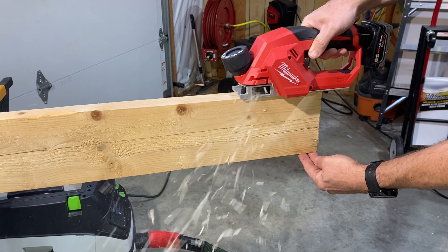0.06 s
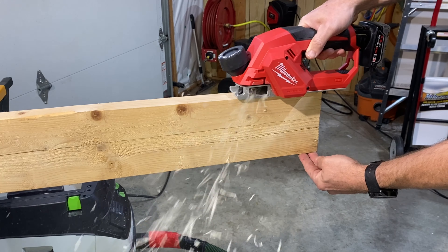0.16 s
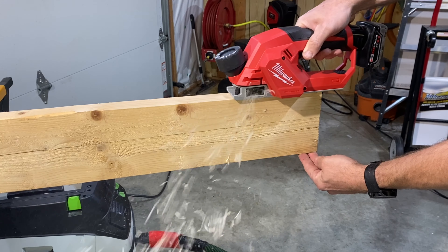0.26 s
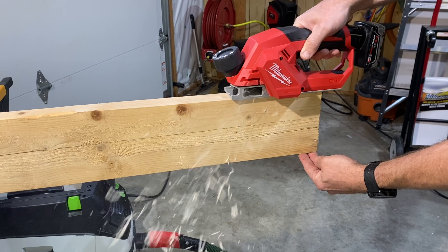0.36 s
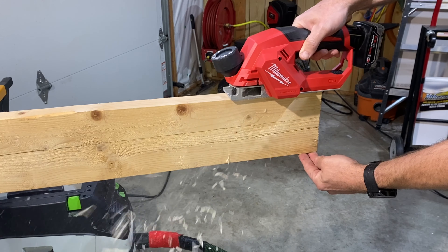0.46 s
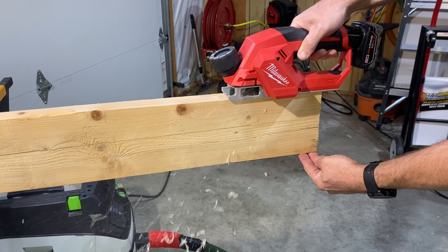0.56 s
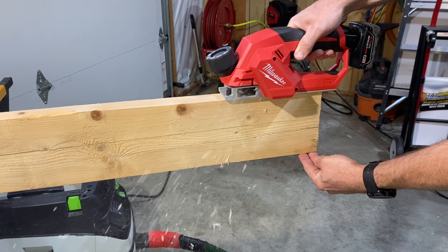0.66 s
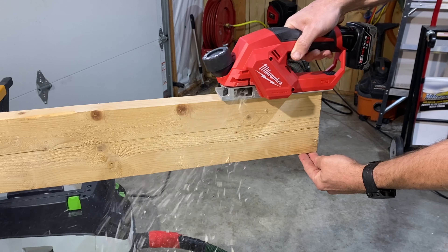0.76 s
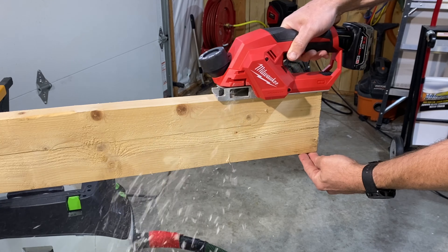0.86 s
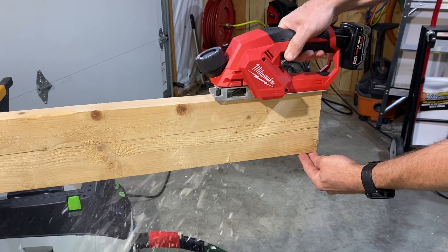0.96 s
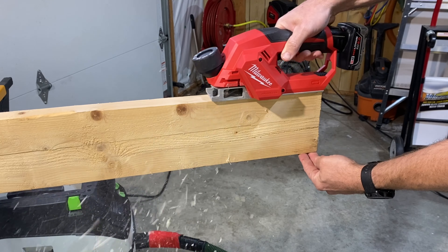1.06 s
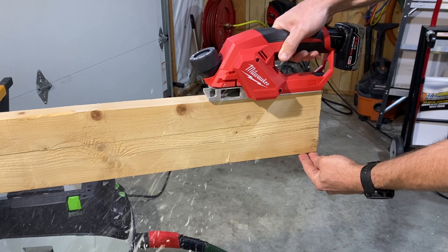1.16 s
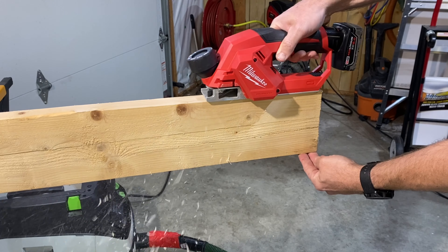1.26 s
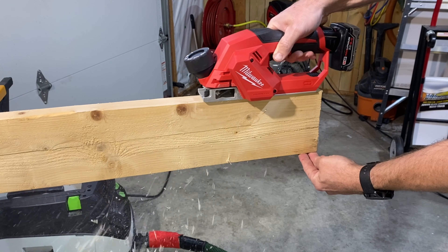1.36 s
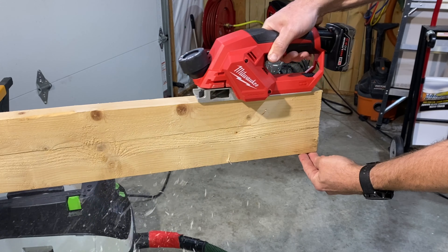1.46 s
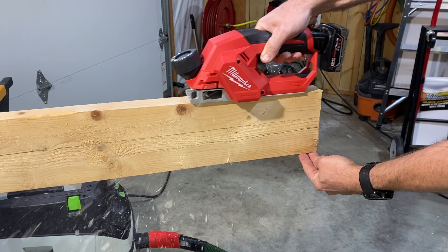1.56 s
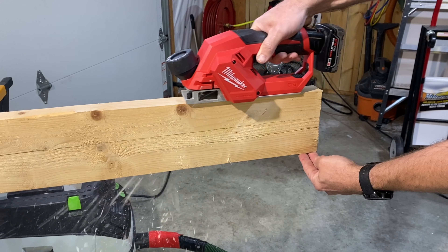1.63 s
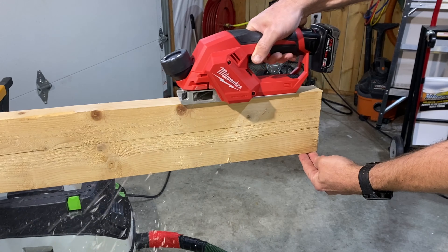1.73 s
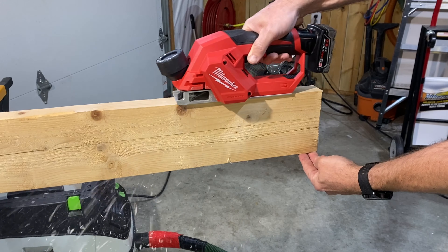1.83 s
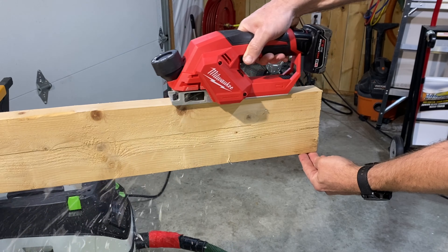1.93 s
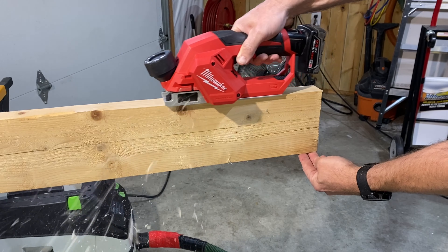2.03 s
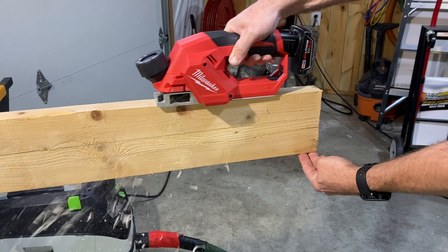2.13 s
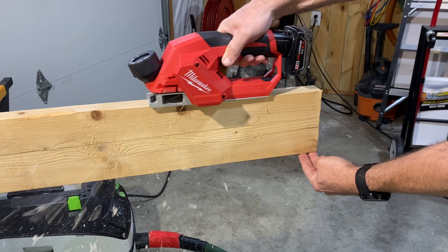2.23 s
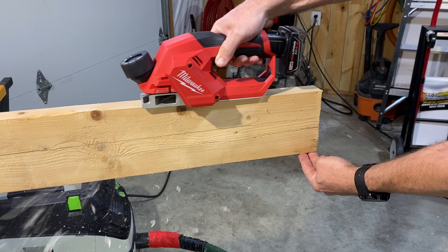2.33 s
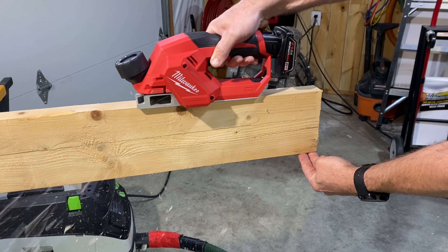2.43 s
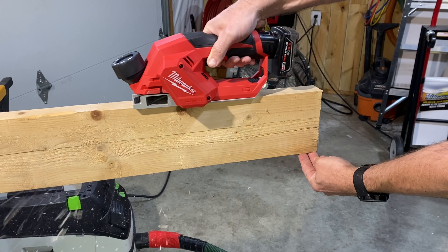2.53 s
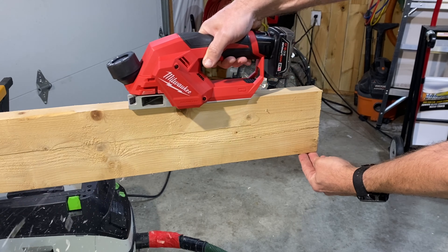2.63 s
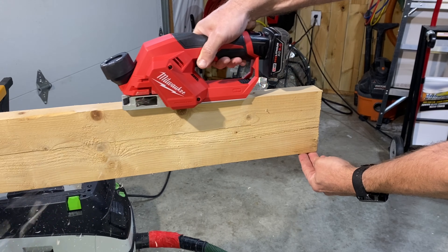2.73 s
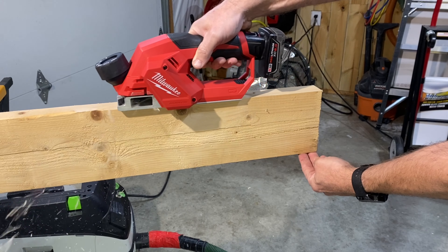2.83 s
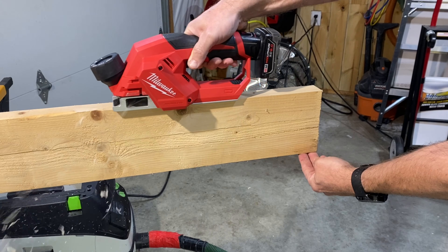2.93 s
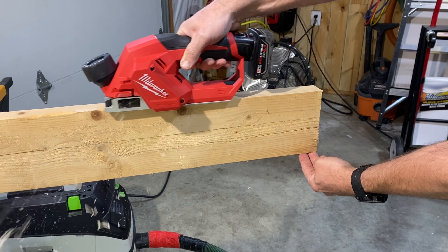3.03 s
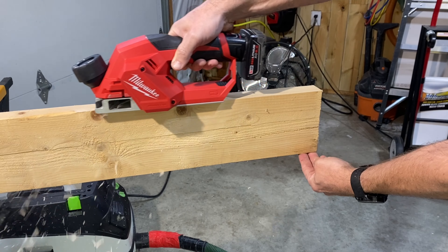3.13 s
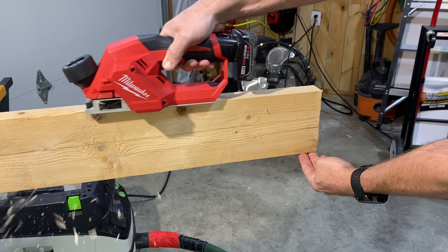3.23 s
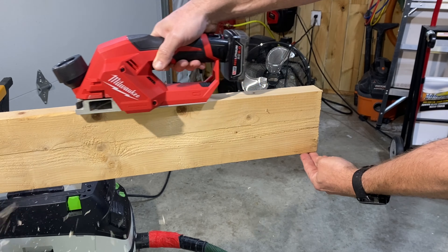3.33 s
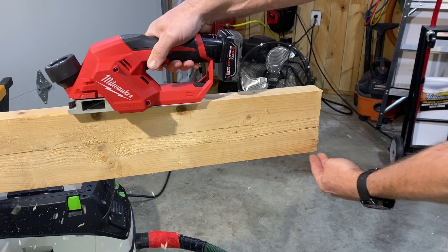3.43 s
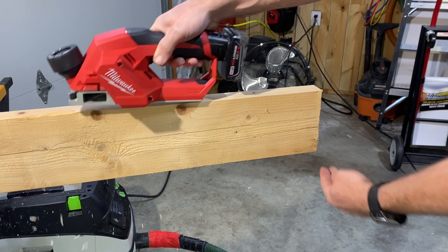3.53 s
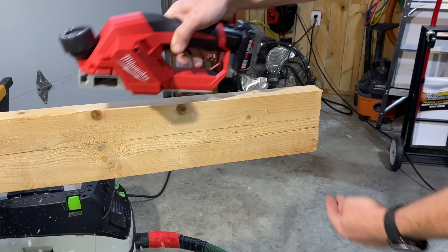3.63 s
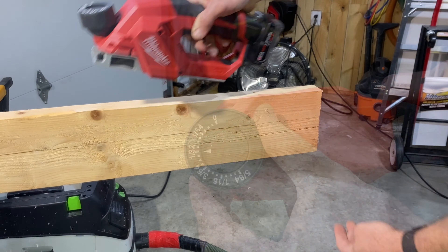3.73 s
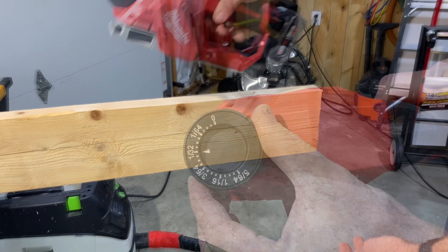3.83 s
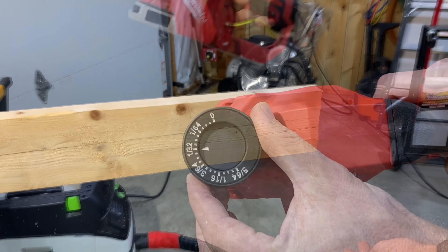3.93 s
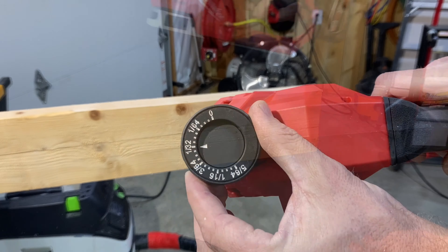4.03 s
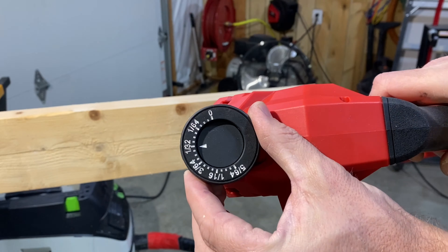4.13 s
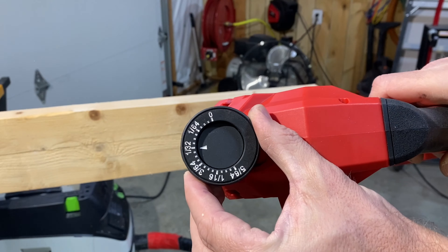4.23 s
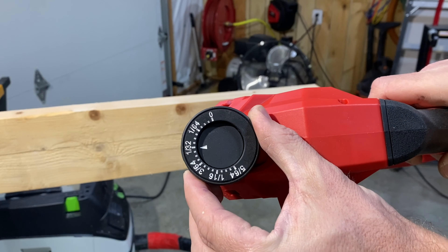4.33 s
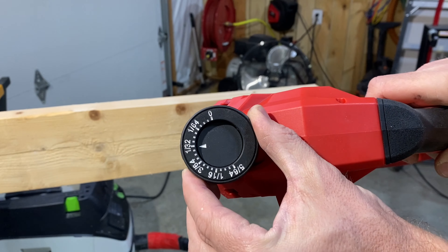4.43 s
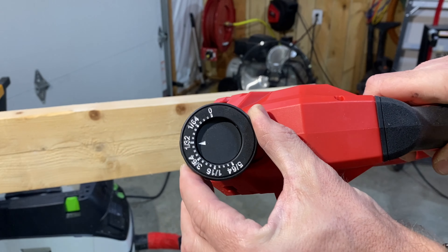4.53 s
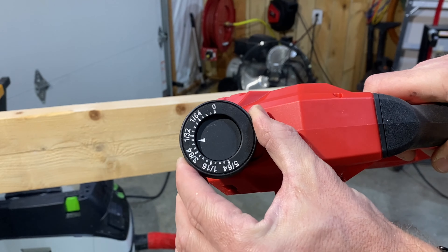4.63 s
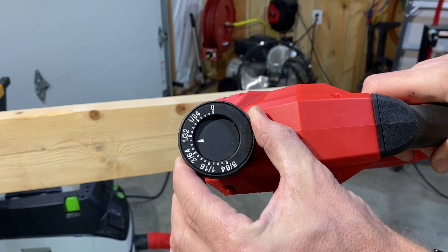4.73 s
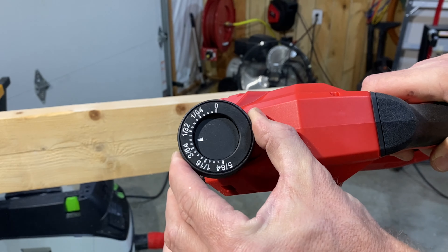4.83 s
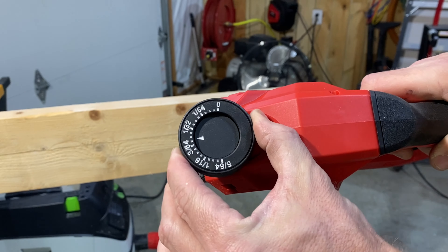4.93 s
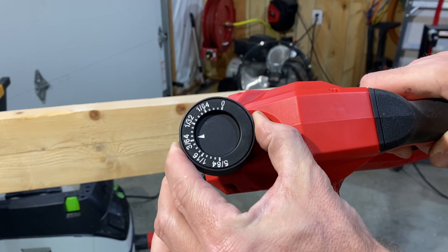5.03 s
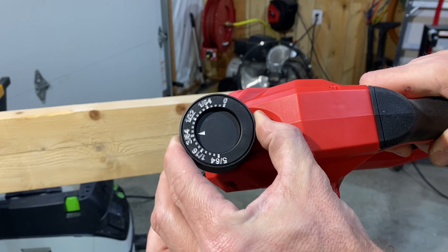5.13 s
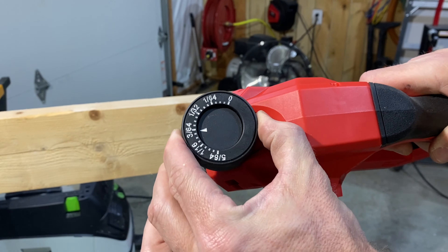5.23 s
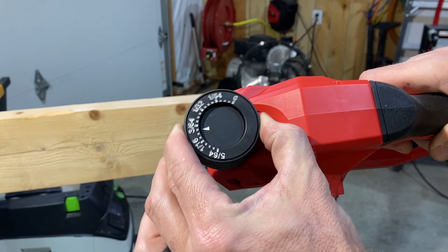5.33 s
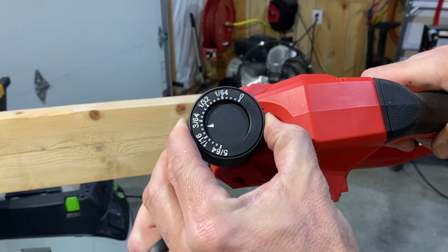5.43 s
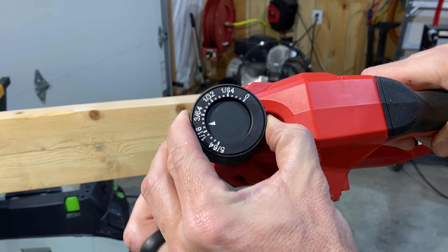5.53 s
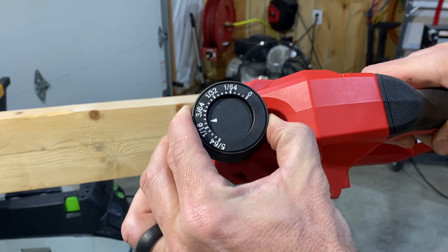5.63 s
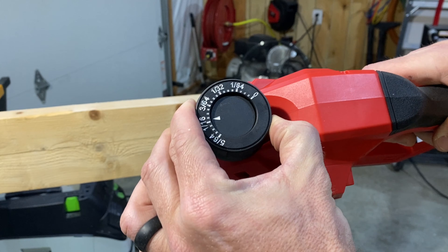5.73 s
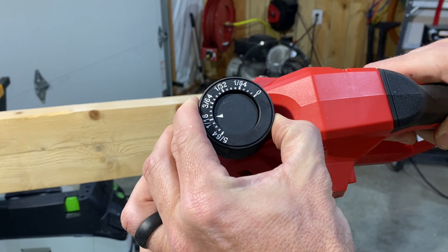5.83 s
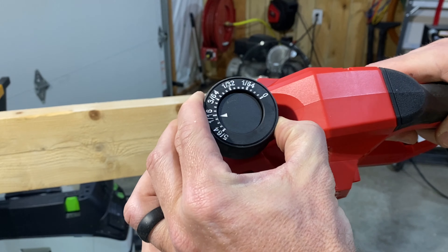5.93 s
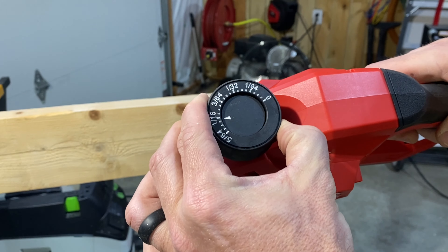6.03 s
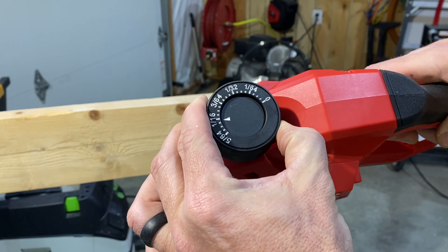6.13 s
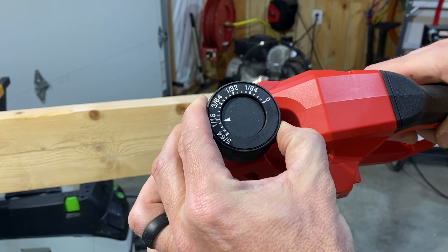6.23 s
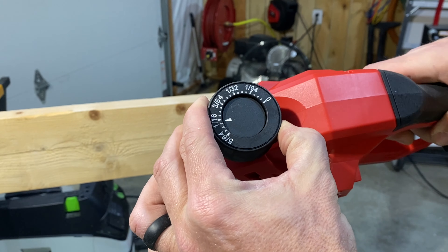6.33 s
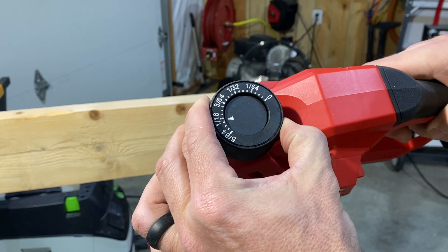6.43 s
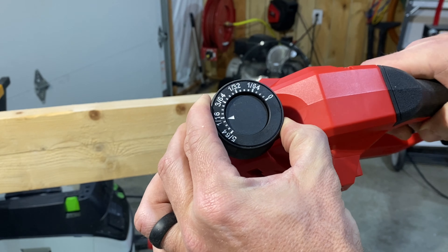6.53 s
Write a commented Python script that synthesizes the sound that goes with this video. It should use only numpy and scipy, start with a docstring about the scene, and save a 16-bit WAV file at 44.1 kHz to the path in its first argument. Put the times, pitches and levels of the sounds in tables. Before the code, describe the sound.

A cordless hand planer shaves a board edge in one long pass, its high whine singing over a rough roar and the hiss of flying chips. The cut runs out and the sound quickly fades. Then the depth dial is turned through eight crisp clicks, each with a bright, short ring, among faint rustles of the hands. The microphone is close, in a workshop with a low hum.

```python
"""A workshop with a low hum, a phone's microphones close to a cordless hand planer. The two-blade drum
bites deep into a board edge, then skims, singing at multiples of its turning rate over the belt-driven
motor and the rush of chips. The cut runs out; at 3.6 s the drum brakes while the planer's whole sound is
faded out, ever faster. Then, among small rustles of the hands, the depth dial is turned through eight
detents, each a snap with a bright, ringing tail."""
import sys
import numpy as np
from scipy import signal
from scipy.fft import rfft, irfft, next_fast_len
from scipy.io import wavfile
from scipy.ndimage import uniform_filter1d, map_coordinates

SR = 44100
rng = np.random.default_rng(int(sys.argv[2]) if len(sys.argv) > 2 else 0)


def materialize(psi):
    """Save the field psi as 16-bit PCM at rate SR to the path in sys.argv[1].

    A 1-D psi becomes a single channel; in a 2-D psi each row is a channel.
    """
    bounded = np.clip(np.atleast_2d(psi).T, -1, 1)
    quanta = np.round(bounded * 32767).astype(np.int16)
    wavfile.write(sys.argv[1], SR, quanta)


N = 289737
T = np.arange(N) / SR

# The pass along the board. Each row: time in seconds, then housing roar, chip hiss and blade bite in dB.
CUT_LEVELS = [(0, -27.5, -32, -2.5), (.12, -31, -35.5, -1.5), (.38, -31.5, -28, -0.5), (.62, -32, -28, -1),
              (.79, -30.5, -29.5, -0.5), (.91, -29.5, -30, -8.5), (1.1, -31.5, -28.5, -3),
              (1.3, -31.5, -28, -0.5), (1.5, -31, -30, -3), (1.75, -31.5, -32.5, -1),
              (1.95, -31.5, -29.5, -4.5), (2.15, -32, -33, 1), (2.55, -32, -31.5, -4),
              (2.75, -31, -31.5, -3), (3.09, -33, -31.5, -5), (3.3, -34.5, -30.5, -1.5),
              (3.6, -30.5, -32.5, -14.5)]

OFF_S, LIFT_BITE_DB = 3.629, -12  # the trigger is let go; the bite drops as the blades lift
DEEP = np.clip(1 - (T - 0.87) / 0.21, 0, 1)  # 1 while the blades bite deep, 0 once they skim
RUNNING_OUT = np.clip((T - 3.03) / 0.102, 0, 1)  # the cut runs out
LIFTED = np.clip((T - 3.38) / 0.03, 0, 1)  # the blades leave the wood
POWERED, SINCE_OFF = T < OFF_S, np.maximum(T - OFF_S, 0)
FADE_DB = -29 * SINCE_OFF - 200 * SINCE_OFF ** 2  # the planer's whole sound is faded out, ever faster
BRAKING_DB = FADE_DB - 200 * SINCE_OFF  # on top of the fade-out, the brake smears most tones away


def amp(db):
    return 10 ** (np.asarray(db) / 20)


def unit(x):
    return x / np.sqrt(np.mean(np.abs(x) ** 2) + 1e-20)


def along(points, hz):
    """Reads (Hz, value) points on a log axis."""
    f, v = np.transpose(points)
    return np.interp(np.log(hz + 1), np.log(f + 1), v)


def curves(rows):
    """One value per sample for each column after the time."""
    s, *cols = np.transpose(rows)
    return [np.interp(T, s, c) for c in cols]


def wobble(rate, size=N):
    """A smooth random curve, rate knots a second."""
    knots = rng.standard_normal(int(size * rate / SR) + 4)
    return map_coordinates(knots, [np.arange(size) * rate / SR])


def filtered(x, response):
    """x through a complex frequency response."""
    m = next_fast_len(x.shape[-1] + SR // 4)
    return irfft(rfft(x, m) * response(np.fft.rfftfreq(m, 1 / SR)), m)[..., :x.shape[-1]]


def resonance(hz, centre, width):
    """The response of one damped mode."""
    return 1j * hz * width / (centre ** 2 - hz ** 2 + 1j * hz * width)


def rush(spectrum, patchy_db, gate=1):
    """Two noises of rms 1, shaped by (Hz, dB) points, pulsed by gate, with patches of random gain."""
    z = signal.stft(gate * rng.standard_normal((2, N)), nperseg=512)[2]
    patches = uniform_filter1d(uniform_filter1d(rng.standard_normal(z.shape[1:]), 5, 0), 12, 1)
    pair = signal.istft(z * amp(patchy_db * unit(patches)), nperseg=512)[1][:, :N]
    return unit(filtered(pair, lambda hz: amp(along(spectrum, hz))))


def tone(phase, db, waver_db, drift, rate, scatter=np.pi):
    """Two sines a quarter cycle apart, wavering as room paths change; drift and scatter in radians."""
    step = 64
    size = N // step + 2
    start = np.exp(1j * scatter * rng.standard_normal())
    pair = []
    for quarter in (1, 1j):
        gain = amp(waver_db * wobble(rate * step, size))
        shift = np.exp(1j * drift * wobble(rate * step, size))
        pair.append(np.interp(np.arange(N) / step, np.arange(size), start * quarter * gain * shift))
    return np.sqrt(2) * amp(db) * (np.exp(1j * phase) * pair).real


def microphone_pair(pair):
    """Two unrelated versions of a sound become left and right, partly alike at the two ports."""
    # Each row: frequency in Hz, correlation of the ports.
    likeness = [(60, 0.84), (400, 0.99), (700, 0.95), (1400, 0.42), (5500, 0.22), (8300, 0.44),
                (11000, 0.41), (12500, 0.71)]
    # Each row: frequency in Hz, lead of the left port in radians.
    lead = [(350, 0.07), (690, 1.15), (1500, 0), (3500, 0.5), (7000, -1), (8270, -4), (11000, -6.5),
            (12100, -8), (14500, -8)]
    # Each row: frequency in Hz, left over right in dB.
    lean = [(60, 0.5), (240, -4), (700, -0.5), (3770, 2.5), (15000, -0.5)]
    angle = lambda hz: np.arccos(along(likeness, hz)) / 2
    mid, side = filtered(pair, lambda hz: np.array([np.cos(angle(hz)), np.sin(angle(hz))]))
    left = lambda hz: amp(along(lean, hz) / 2) * np.exp(.5j * along(lead, hz))
    return filtered(np.array([mid + side, mid - side]), lambda hz: np.array([left(hz), 1 / left(hz)]))


def room_tone():
    """The workshop's low, wavering hum and the faint hush of still air."""
    # Each row: frequency in Hz, relative density in dB.
    hum_spectrum = [(15, -58.5), (35, -27), (55, -7), (92, -4), (107, -7), (120, -17), (225, -23),
                    (335, -35), (600, -41.5), (1000, -60.5)]
    # Each row: time in seconds, level in dB.
    hum_level = [(0, -64), (4.2, -66.5), (5.9, -67.5), (6.2, -69.5)]
    hum_db, = curves(hum_level)
    hum = amp(hum_db + 2 * wobble(6)) * rush(hum_spectrum, 1.7)
    still_air = amp(-88.5) * rush([(200, -10.5), (600, 0.5), (6000, -20.5), (8500, -59.0)], 1.8)
    return hum + still_air


def handling():
    """Hands shift on the tool: faint rustles that rise, hold and die in the room."""
    # Each row: start and hold in seconds, dull and bright level in dB.
    rustles = [(4.183, 0.04, -66.5, -69), (4.502, 0.18, -76, -74), (6.25, 0.115, -77, -82.5),
               (6.466, 0.066, -73, -74), (6.54, .1, -78.5, -71.5)]
    rise_s, t60_s = .003, 0.28
    dull = rush([(200, -50), (350, -3.5), (1000, -3.0), (1800, -7.5), (2500, -36.5)], 4.9)
    bright = rush([(1500, -20), (2300, -5.0), (5000, -12.5), (9500, -21), (11000, -41.0)], 4.3)
    out = np.zeros((2, N))
    for s, hold, dull_db, bright_db in rustles:
        shape = np.clip((T - s) / rise_s, 0, 1) * amp(-60 * np.maximum(T - s - hold, 0) / t60_s)
        out += shape * (amp(dull_db) * dull + amp(bright_db) * bright)
    return out


def click_tail():
    """A bright, ringing click tail, with a gap near 13 kHz that is not the room's; a fresh pair."""
    # Each row: frequency in Hz, relative density in dB.
    colour = [(180, -56), (300, -31.5), (1300, -24.5), (1650, -23), (2300, -13), (3150, -5), (3650, -10),
              (4150, -6.5), (5000, -12), (5700, -6.5), (6600, -17), (7800, -7.5), (8600, -16), (9800, -9),
              (12500, -16.5), (13300, -54), (14700, -10.5), (16000, -21.5)]
    # Each row: frequency in Hz, seconds to fall 60 dB.
    decay = [(300, 0.2), (2000, 0.37), (5000, 0.39), (11000, 0.28), (15000, 0.16)]
    hz, t, z = signal.stft(rng.standard_normal((2, SR // 2)), SR, nperseg=256)
    db = along(colour, hz)[:, None] - 60 * t / along(decay, hz)[:, None]
    tail = signal.istft(z * amp(db), SR, nperseg=256)[1]
    return tail / np.linalg.norm(tail[0])


def detent(t, knock_db, ring_db):
    """The ball scrapes over a crest, drops at t = 0 and rattles: the knob rings, the housing knocks."""
    # The knob's broad modes. Each row: centre and width in Hz, relative level in dB.
    modes = [(2150, 650, -10), (3170, 340, 3), (4660, 740, -12), (5266, 450, -5.5), (7690, 560, -1),
             (9700, 610, -2.5), (11500, 1800, -9.5), (14720, 1200, -16)]
    # Its lasting ring. Each row: frequency in Hz, level in dB, seconds to fall 60 dB.
    rings = [(3103, -29, 0.061), (3180, -42, 0.31)]
    creep = np.exp(t / 0.00036) + 0.017 * np.exp(t / 0.0048)
    rattle = 0.22 * rng.standard_normal((2, len(t))) * np.where(t < 0, creep, np.exp(-t / 0.001))
    rattle = filtered(rattle, lambda hz: hz ** 2 / (hz ** 2 + 5500 ** 2))  # thin and bright
    drop = filtered(1. * (np.abs(t) < .5 / SR), lambda hz: np.array([[1], [-.6j]]))
    grip_db = rng.normal(0, 2.2, len(modes))  # the fingers damp other modes each time
    knob = lambda hz: sum((-1) ** k * amp(db + grip_db[k]) * resonance(hz, centre, width)
                          for k, (centre, width, db) in enumerate(modes))
    snap = filtered(rattle + drop, knob)
    quarter = np.array([[0], [np.pi / 2]])
    ring = (t > 0) * sum(amp(db + ring_db - 60 * t / t60) * np.sin(2 * np.pi * hz * t - quarter)
                         for hz, db, t60 in rings)
    blow = rng.standard_normal((2, len(t))) * (t > 0) * t ** 2 * np.exp(-t / 0.0026)
    knock = filtered(blow, lambda hz: resonance(hz, centre=640, width=800) ** 2)
    return snap / np.abs(snap).max() + ring + amp(knock_db) * knock / np.abs(knock).max()


def depth_dial():
    """Detents and light ticks reach the microphones directly and off near walls, then ring out."""
    # Each row: time in seconds, level in dB, then housing knock and knob ring in relative dB.
    detents = [(4.577, -8.5, -28.5, 3.5), (4.836, -9, -34.5, 2.5), (4.987, -8.5, -37.5, 3),
               (5.1765, -9.5, -38.5, 3.5), (5.3561, -8, -38.5, 1.5), (5.5282, -6.5, -41, -2),
               (5.7017, -7, -53, -6.5), (5.9353, -9, -59, -7)]
    # The dial ticks under the fingers. Each row: time in seconds, level in dB.
    ticks = [(4.0705, -64), (4.1563, -46), (4.4978, -43.5), (6.315, -47.5)]
    # Each row: echo delay in seconds, level in dB.
    walls = [(.0028, -15), (.0062, -16), (.0085, -19.5)]
    creep_s, detent_tail_db, tick_tail_db, tick_knock_db = .03, -1.5, 2, -32
    clicks = [(*row, detent_tail_db) for row in detents]
    clicks += [(s, db, tick_knock_db, 0, tick_tail_db) for s, db in ticks]
    out, t = np.zeros((2, N + SR)), np.arange(SR // 3) / SR - creep_s
    for s, db, knock_db, ring_db, tail_db in clicks:
        direct = detent(t, knock_db, ring_db)
        echoes = sum(amp(level + rng.normal(0, 2.8)) * np.roll(direct, round(delay * SR), axis=1)
                     for delay, level in walls)
        tail = np.pad(click_tail(), ((0, 0), (round((creep_s + 0.0047) * SR), 0)))
        start = round((s + 0.00054 - creep_s) * SR)
        out[:, start:start + len(t)] += amp(db) * (direct + echoes)
        out[:, start:start + tail.shape[1]] += amp(db + tail_db) * tail
    return out[:, :N]


def brake(turn):
    """A rough whine swells at switch-off and falls in pitch with the braking drum."""
    rise = np.clip(SINCE_OFF / .06, 0, 1) ** 2
    return rise * tone(26.5 * turn, -43 + FADE_DB, waver_db=3, drift=2.8, rate=220)


def whine(turn):
    """A fuzzy whine; the drum's turn puts side lines on it."""
    # Each row: offset in drum orders, relative level in dB, gain in dB as the cut runs out.
    lines = [(0, -1, 0), (-1, -7, 8), (-1.7, -5, 2)]
    whine_hz, level_db = 1511, -38 + BRAKING_DB
    return sum(tone(2 * np.pi * whine_hz * T + k * turn, level_db + db + gain_db * RUNNING_OUT,
                    waver_db=3.5, drift=0.89, rate=35) for k, db, gain_db in lines)


def motor(turn, bite_db):
    """The belt couples motor and drum, so the motor sounds its own orders and sums of both."""
    # Each row: motor order, drum orders added to it.
    lines = [(1, 0), (1, 1), (1, 2), (1, 3), (1, 4), (8, 0), (12, 0), (8, 12)]
    # The level of each line in dB.
    levels = [-49.5, -47, -51.5, -50.5, -40.5, -47, -47, -55]
    belt_ratio = 1.555  # motor turns per drum turn
    out = sum(tone((m * belt_ratio + k) * turn, db + BRAKING_DB - 4 * DEEP,
                   waver_db=3.5, drift=0.5, rate=6) for (m, k), db in zip(lines, levels))
    comb_db = -56.5 + 3.5 * T + bite_db + BRAKING_DB
    for k in range(18, 25):  # a comb of thin lines above the eighth motor order
        out += tone((8 * belt_ratio + k) * turn, comb_db, waver_db=2, drift=.5, rate=10)
    return out


def rushing_chips(turn):
    """The housing roars and the chips hiss, pulsing with each blade pass; the hiss is faded out first."""
    # The housing's roar. Each row: frequency in Hz, relative density in dB.
    roar_spectrum = [(59, -70.5), (100, -32.5), (213, -20.5), (383, -18), (490, -12.5), (1300, -6.5),
                     (1680, -4.5), (1850, -9), (3000, -11), (8800, -120)]
    # The chips' hiss, same columns.
    hiss_spectrum = [(1500, -27.5), (2500, -10), (3700, -7), (5000, -6.5), (7200, -8.5), (8500, -10.5),
                     (9700, -5), (11700, -11.5), (12400, -9.5), (12650, -54.5)]
    roar_db, hiss_db, _ = curves(CUT_LEVELS)
    chatter_db = POWERED * RUNNING_OUT * wobble(100)  # the sole rattles as the cut runs out
    roar_pulse = np.exp(0.41 * POWERED * np.cos(2 * turn))
    roar = amp(roar_db + 1.15 * FADE_DB + chatter_db) * rush(roar_spectrum, 2.1, roar_pulse)
    # one blade cuts deeper than the other
    chip_pulse = np.exp(POWERED * (0.19 * np.cos(2 * turn) + 0.12 * np.cos(turn)))
    hiss = amp(hiss_db + LIFTED + 1.55 * FADE_DB) * rush(hiss_spectrum, 2.5, chip_pulse)
    return roar + hiss


def blade_drum(turn, bite_db):
    """The drum sounds multiples (orders) of its turning rate; high ones add to one strike a blade."""
    strong = (1, 2, 8)  # unbalance, blade pass and the main whine
    # Each row: time in seconds, level in dB of each strong order.
    strong_levels = [(0, -40.5, -38.5, -36.5), (.5, -35, -36, -40.5), (.8, -37, -39, -30),
                     (.91, -33.5, -41, -40.5), (.94, -39.5, -41.5, -29), (1.11, -38.5, -43.5, -39.5),
                     (1.2, -39.5, -37, -25.5), (1.48, -45.5, -37, -27.5), (1.68, -43, -29.5, -27.5),
                     (2.16, -41.5, -36, -28.5), (2.72, -49.5, -33.5, -28.5), (3.05, -40, -33.5, -35.5),
                     (3.3, -39.5, -39.5, -31), (3.4, -51, -35.5, -37.5), (3.6, -58.5, -39, -39.5),
                     (3.67, -52.5, -46, -63), (3.8, -65, -71, -50)]
    singing = (10, 12, 14, 22, 24)  # these come and go with the wood
    # Each row: time in seconds, level in dB of each singing order.
    singing_levels = [(0.05, -37.5, -37.5, -38.5, -36, -30), (0.25, -34.5, -50, -37, -37.5, -44.5),
                      (0.45, -43.5, -39.5, -43, -43, -48), (0.65, -35.5, -34.5, -32.5, -34, -30),
                      (0.851, -37.5, -35, -35, -35, -43), (1.05, -33.5, -29, -41, -35.5, -32),
                      (1.25, -27.5, -35.5, -35.5, -30, -35.5), (1.45, -35, -32.5, -46, -38.5, -43),
                      (1.65, -30.5, -34, -37, -39, -35.5), (1.85, -44.5, -37, -38.5, -47.5, -34),
                      (2.05, -37.5, -47, -33.5, -36, -35), (2.25, -39, -37.5, -33.5, -42.5, -33),
                      (2.45, -44.5, -38.5, -34.5, -35, -35.5), (2.65, -32, -30, -34.5, -45, -38.5),
                      (2.85, -41, -33.5, -37.5, -44, -34), (3.05, -40, -37, -38.5, -41.5, -39.5),
                      (3.25, -45, -38.5, -63, -45, -35.5), (3.45, -39.5, -42, -51, -35, -44)]
    # Even orders, one pulse per blade. Each row: order, level in dB in a deep cut and in a light cut.
    both_blades = [(4.13, -37, -38), (6.15, -40.5, -40), (15.9, -38, -44.5), (18.3, -36, -40.5),
                   (20, -35, -41.5), (25.45, -44, -40), (28.2, -51.5, -41), (33.14, -33.5, -35.5),
                   (31, -41, -34.5), (35.4, -38, -41), (44.3, -44.5, -41.5), (55.8, -45.5, -58)]
    # Odd orders, from one blade cutting deeper, same columns.
    one_blade = [(3.03, -44.5, -40), (5, -39.5, -38), (6.95, -46.5, -41.5), (9.3, -56, -57.5),
                 (13, -46, -46), (14.9, -41, -51), (16.9, -50, -50.5), (18.8, -38.5, -51.5),
                 (20.7, -43.5, -57), (24.5, -37, -50.5), (32.8, -42.5, -46), (37.6, -46.5, -41.5),
                 (54.6, -46.5, -58)]
    strike_order = 17  # from here up the phases line up
    scatter = lambda k: .5 if k >= strike_order else np.pi
    phase = lambda k: k * turn + .04 * max(33 - k, 0) ** 2  # lower orders trail in the strike
    out = sum(tone(k * turn, db + FADE_DB, waver_db=1.27, drift=0.56, rate=10)
              for k, db in zip(strong, curves(strong_levels)))
    grain_db = (1 - LIFTED) * wobble(45)  # chatter in the grain: all high orders jump together
    for k, db in zip(singing, curves(singing_levels)):
        db += BRAKING_DB + (LIFT_BITE_DB * LIFTED + grain_db) * (k >= strike_order)
        out += tone(phase(k), db, waver_db=1.85, drift=0.19, rate=1.5 * k, scatter=scatter(k))
    for k in np.setdiff1d(np.arange(1, 57), strong + singing):
        order, deep_db, light_db = np.transpose(one_blade if k % 2 else both_blades)
        db = DEEP * np.interp(k, order, deep_db) + (1 - DEEP) * np.interp(k, order, light_db)
        db += BRAKING_DB + (bite_db + grain_db) * min(k / 18, 1)
        db -= 5 * RUNNING_OUT * (k in (3, 4, 5))  # the board drones on these until the cut runs out
        db += 3 * wobble(2.5)  # each order swells and sinks as the tool slides along
        out += tone(phase(k), db, waver_db=3, drift=0.51, rate=3 + 1.1 * k, scatter=scatter(k))
    return out


def planer():
    """The drum's angle drives the tones and the pulsing; after switch-off the brake slows it evenly."""
    # Each row: time in seconds, drum turns a second under power.
    speed = [(0, 211.4), (.27, 212.3), (.35, 210.1), (.52, 212.8), (.66, 208.9), (.75, 209.3), (1.02, 216),
             (1.64, 219.9), (2.12, 217.4), (2.5, 219), (2.67, 221), (3.17, 215.4), (3.37, 216),
             (3.55, 220.3)]
    slowing_hz_per_s = 680
    powered_hz, = curves(speed)
    drum_hz = np.maximum(powered_hz - slowing_hz_per_s * SINCE_OFF, 0)
    turn = 2 * np.pi * np.cumsum(drum_hz) / SR
    _, _, bite_db = curves(CUT_LEVELS)
    tones = blade_drum(turn, bite_db) + motor(turn, bite_db) + whine(turn) + brake(turn)
    return tones * (SINCE_OFF < 0.18) + rushing_chips(turn)


def scene():
    """The tool shifts a little in front of the microphones, over room tone and handling."""
    # Each row: time in seconds, left over right in dB.
    position = [(0, -1.5), (3.6, 0.2), (4.5, -1), (6, -2)]
    lean_db, = curves(position)
    background = microphone_pair(room_tone() + handling())
    tool = microphone_pair(planer() + depth_dial())
    return background + tool * amp([lean_db / 2, -lean_db / 2])


def record(dry):
    """The phone's microphones roll off in the deep bass; nothing is kept above the band limit."""
    bass_hz, top_hz = 40, 16500
    return filtered(dry, lambda hz: (hz < top_hz) * hz ** 2 / (hz ** 2 + bass_hz ** 2))


dry = scene()
out = record(dry)
materialize(out)
```